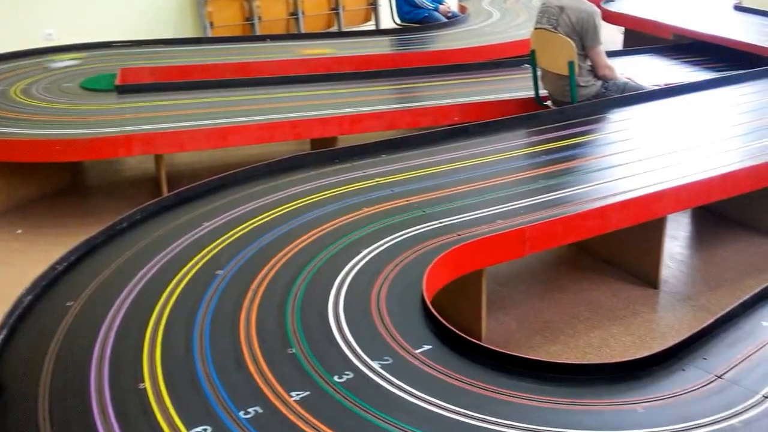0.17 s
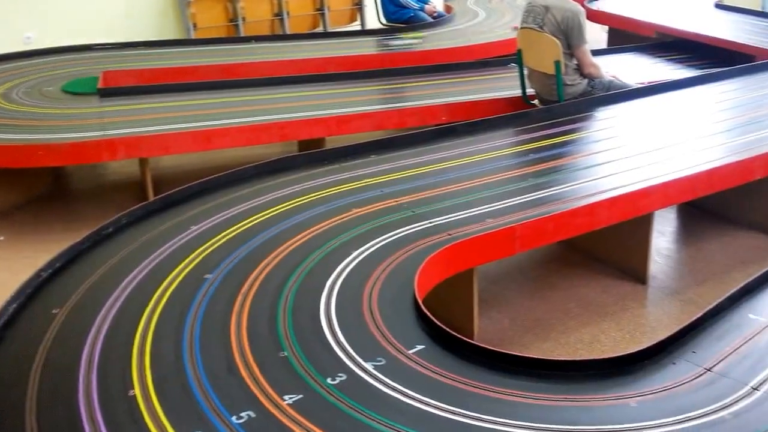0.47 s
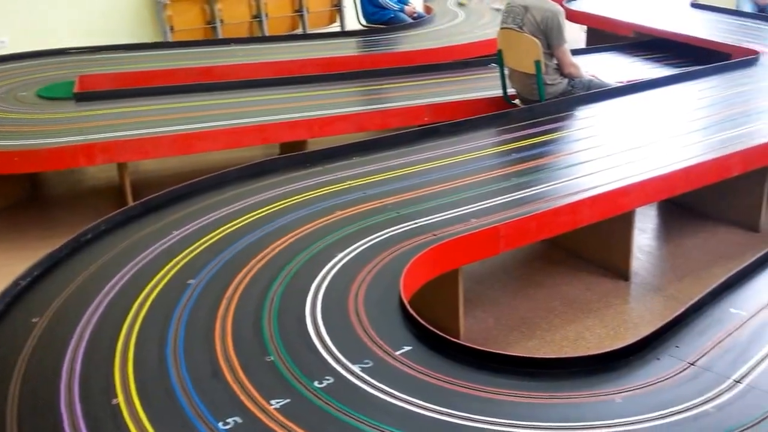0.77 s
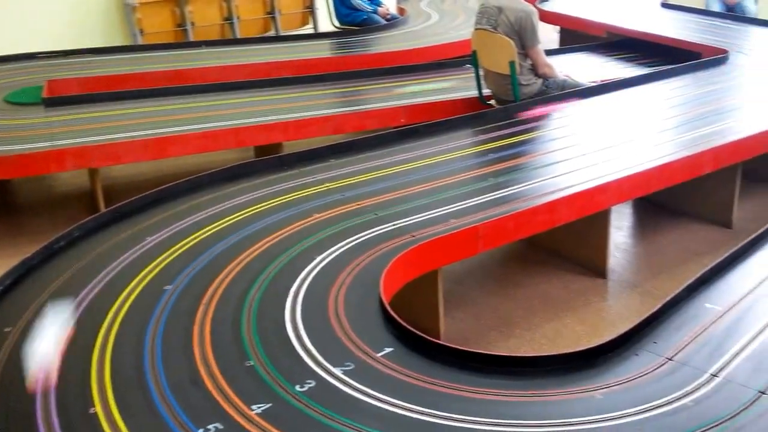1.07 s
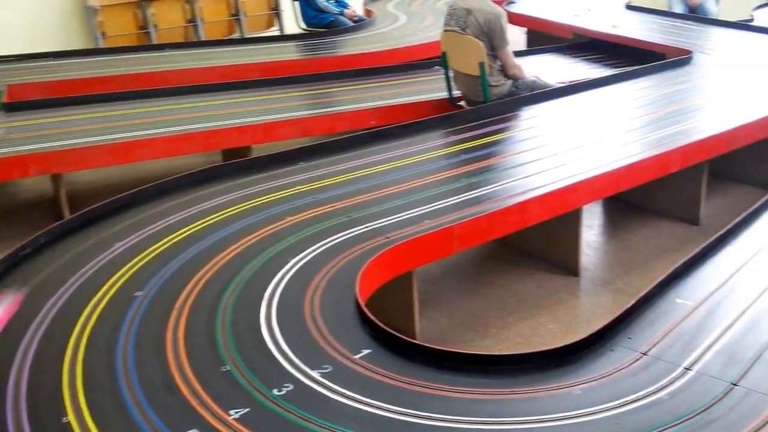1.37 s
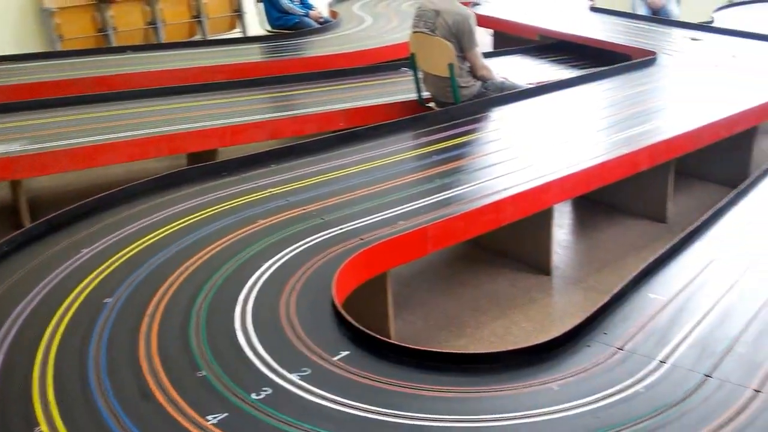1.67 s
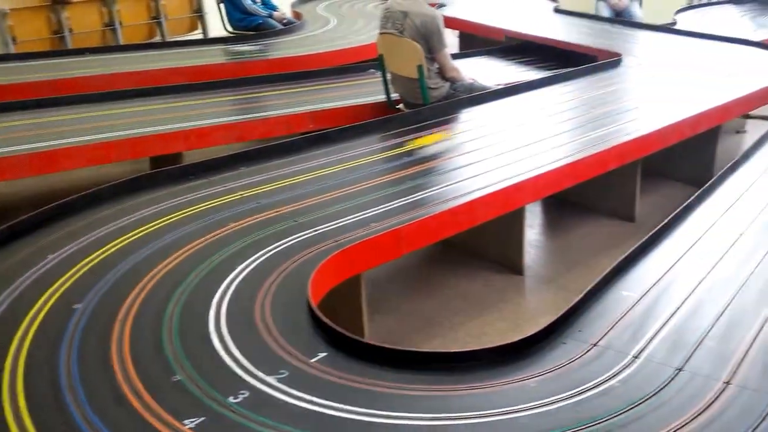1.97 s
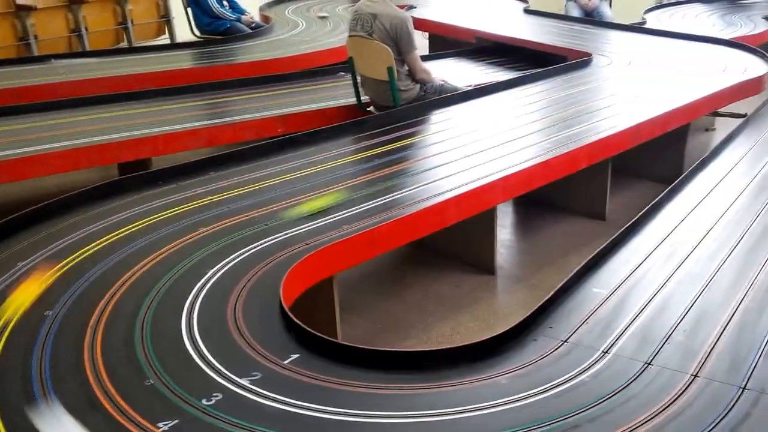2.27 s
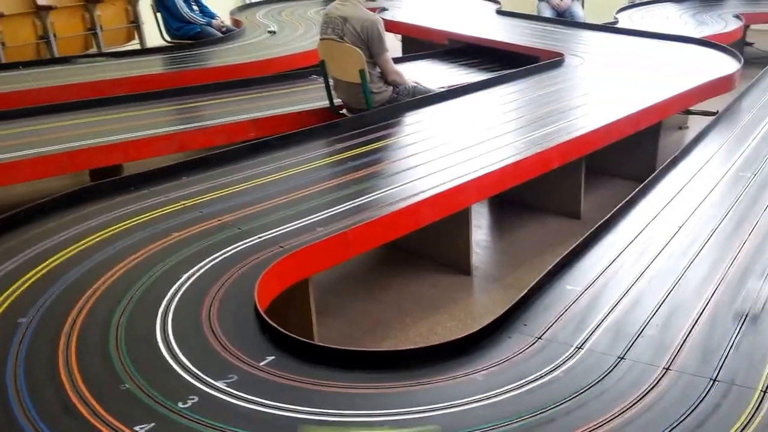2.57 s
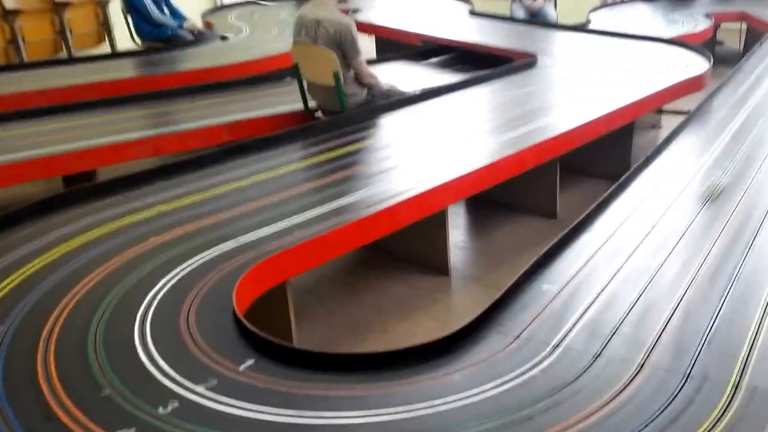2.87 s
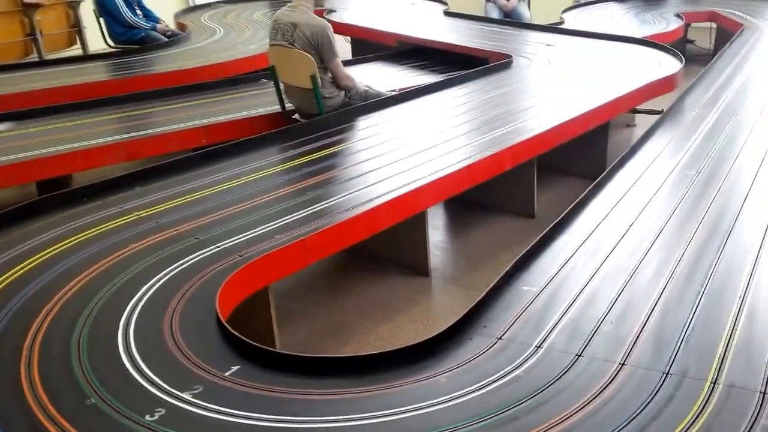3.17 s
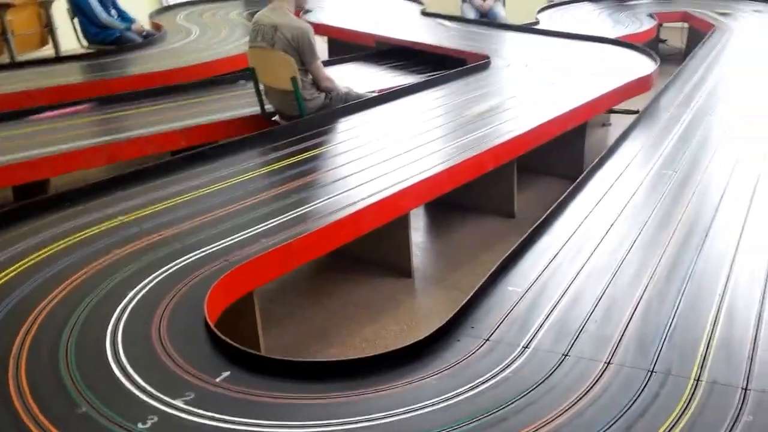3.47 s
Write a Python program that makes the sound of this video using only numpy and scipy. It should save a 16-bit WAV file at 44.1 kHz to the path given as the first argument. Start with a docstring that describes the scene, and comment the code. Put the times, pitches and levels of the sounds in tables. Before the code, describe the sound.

Small slot cars whine past on an indoor track, pitch rising and falling over a bright sizzle

```python
"""Slot cars race round a big wooden track in a hall. From the start, small three-pole motors whine
up on the straights and down into the bends, swelling as they come near, over a noisy sizzle,
tyre rumble on the boards and a steady hum. The rest of the field and the far lanes ring in the hall.
Halfway through comes a brief rattle; later the boards rumble more for a moment.
Motors and hum are built from sine waves; sizzle, rumble and rattle are shaped noise."""
import sys
import numpy as np
from scipy import signal
from scipy.fft import rfft, irfft
from scipy.io import wavfile
from scipy.ndimage import uniform_filter1d

SR = 44100
rng = np.random.default_rng(int(sys.argv[2]) if len(sys.argv) > 2 else 0)


def unload_wav(signal):
    """Save mono or channel-first audio to the path in sys.argv[1] as 16-bit WAV at rate SR, clipped to [-1, 1]."""
    wavfile.write(
        sys.argv[1],
        SR,
        np.round(np.clip(np.atleast_2d(signal).T, -1, 1) * 32767).astype(np.int16),
    )


N = 160083
TIME = np.arange(N) / SR  # s


def amp(db):
    """Turns decibels into a gain."""
    return 10 ** (np.asarray(db) / 20)


def unit(x):
    """Scales a signal to an rms of 1."""
    return x / np.sqrt(np.mean(abs(x) ** 2) + 1e-20)


def read(points, hz):
    """Reads a curve between its points, on a log-frequency axis."""
    f, value = np.transpose(points)
    return np.interp(np.log(hz + 1), np.log(f + 1), value)


def wander(rate_hz):
    """Smooth random motion with rms 1: noise whose spectrum fades out around the given rate."""
    f = np.fft.rfftfreq(N, 1 / SR)
    keep_slow = np.exp(-(f / rate_hz) ** 2) * (f > 0)
    return unit(irfft(rfft(rng.standard_normal(N)) * keep_slow, N))


# How alike noise is at the two ears, below 0 where they oppose: (f/Hz, likeness from -1 to 1)
EAR_LIKENESS = [(250, .988), (1200, .87), (2800, .45), (4000, -.05), (5000, -.5), (7000, -.8)]
# Which ear gets more of the noise: (f/Hz, left minus right level/dB)
EAR_BALANCE = [(300, -0.5), (1400, 1.5), (2900, -2.5), (4700, 0), (7000, -9)]


def noise(spectrum, level_db, patch_db, size=1024):
    """Two-ear noise with rms 1: random spectra in short frames, with drifting patches and a level field."""
    hop = size // 4
    hz = np.fft.rfftfreq(size, 1 / SR)
    t = np.arange(N // hop + 5) * hop / SR
    a, b, c, d, patches = rng.standard_normal((5, len(t), len(hz)))
    same = np.clip(read(EAR_LIKENESS, hz), -1, 1)
    left = a + 1j * b
    right = same * left + np.sqrt(1 - same ** 2) * (c + 1j * d)
    # Smooth the patches over 12 frames, then 3 frequency bins
    patches = uniform_filter1d(uniform_filter1d(patches, size=12, axis=0), size=3, axis=1)
    db = read(spectrum, hz) + patch_db * unit(patches) + level_db(t, hz)
    balance = read(EAR_BALANCE, hz)
    frames = np.array([(left * amp(db + balance / 2)).T, (right * amp(db - balance / 2)).T])
    return unit(signal.istft(frames, nperseg=size, noverlap=size - hop)[1][:, :N])


POLES = 3  # the whine is this multiple of the shaft speed
WHINE_DB = -2  # gain on every motor
RASP = 0.21  # depth of the gear chatter
FLUTTER = 0.33  # depth of the waver from track reflections, before closeness lessens it
CLOSE_DB = -19.5  # louder, closer cars flutter less in level and warble more in pitch
# The whine stands out more from the other partials as speed rises
CRUISE_HZ, PURITY_DB_PER_OCTAVE = 4160, 12
# Partials of a motor at 1, 2, 3 .. times the shaft speed: (level/dB at cruising speed)
PARTIALS = [-28.5, -27.5, 3.5, -17.5, -18.5, -6]


def motor(run, wobble, lag_ms=0, pan_db=0, fade_s=.015):
    """A motor sounds the multiples of its shaft speed, with jitter, flutter and gear chatter."""
    out = np.zeros((2, N))
    s, hz, db = np.transpose(run)
    on = np.flatnonzero((TIME > s[0] - fade_s) & (TIME < s[-1] + fade_s))
    t = TIME[on]
    # Random time shifts keep the unsteadiness of the motors apart
    shift = rng.integers(0, N, (len(PARTIALS), 4))
    gate = np.clip(np.minimum(t - s[0], s[-1] - t) / fade_s + 1, 0, 1)
    level = gate * amp(np.interp(t, s, db))
    closeness = 1 + (level / amp(CLOSE_DB)) ** 2
    jitter, chatter, flutter = wobble
    warble = 1 + np.sqrt(closeness) * jitter[on - shift[0, -1]]
    shaft = np.interp(t, s, hz) / POLES * warble
    turns = np.cumsum(shaft) / SR
    depth = FLUTTER / closeness
    steady_power = np.sqrt(1 + 2 * depth ** 2)
    purity_db = PURITY_DB_PER_OCTAVE * np.log2(POLES * shaft / CRUISE_HZ)
    for k, partial_db in enumerate(PARTIALS):
        multiple = k + 1
        partial = level * amp(partial_db - purity_db * (multiple != POLES)) / steady_power
        for ear, side in enumerate((.5, -.5)):  # left, right
            heard_turns = turns - side * shaft * lag_ms / 1000
            tone = np.exp(2j * np.pi * multiple * heard_turns)
            tone *= 1 + depth * flutter[on - shift[k, ear]] + RASP * chatter[on - shift[k, 2]]
            out[ear, on] += partial * tone.real * amp(side * pan_db)
    return amp(WHINE_DB) * out


def unsteadiness():
    """Random motion for all motors: pitch jitter, gear chatter and flutter from track reflections."""
    jitter = wander(44.7)
    chatter = wander(456) + 1j * wander(456)
    # Complex motion wavers both level and phase
    flutter = wander(34) + 1j * wander(34)
    return jitter, chatter, flutter


WOBBLE = .002  # relative speed jitter, before closeness raises it
# One row for each run of a tone within earshot; a few, near 6 kHz at 0.19 s and 2.56 s, sound the octave of a
# lower car's whine: (lag of left ear/ms, left minus right level/dB, # curve of (t/s, f/Hz of the tone, level/dB
# before the motor's gains))
NEAR_RUNS = [ (0.047, 1.5, [(0.0, 5270, -22.5), (0.06, 4880, -24.0), (0.11, 4315, -22.5),
             (0.17, 3710, -35.5)]), (0.071, -1.5, [(0.0, 3850, -44.5), (0.03, 4160, -20), (0.09, 4840, -21),
             (0.15, 5230, -32), (0.2, 5500, -21), (0.25, 5190, -29), (0.3, 4680, -26),
             (0.37, 3720, -39.5)]), (-0.088, -4, [(.19, 2790, -33), (.29, 2943, -27), (.35, 3350, -30),
             (.4, 3990, -24.5), (.5, 4990, -32.5), (.61, 5490, -31), (.72, 4720, -36), (.79, 3560, -38)]),
             (-0.096, -5, [(0.19, 6200, -27.5), (0.25, 5810, -25.0), (0.34, 6150, -32), (0.47, 6110, -34.5),
             (0.56, 6540, -33)]), (.045, -1, [(.91, 3900, -37), (1.0, 4780, -35), (1.15, 5860, -35)]),
             (0.061, 0, [(1.24, 3850, -33.5), (1.3, 4320, -28), (1.42, 3880, -35.5), (1.6, 4034, -28.5),
             (1.68, 4116, -19), (1.745, 4256, -22.5), (1.79, 4370, -25), (1.865, 4736, -15),
             (1.885, 4660, -20.5), (1.93, 4756, -10.5), (1.97, 4830, -16), (2.005, 4790, -20.5),
             (2.05, 4910, -19), (2.16, 5270, -30)]), (0.055, -2, [(1.2, 3794, -33), (1.42, 3713, -29.5),
             (1.54, 3530, -24.5), (1.6, 3790, -27), (1.64, 4466, -18.5), (1.69, 4617, -15.5),
             (1.745, 4900, -25.5), (1.8, 5000, -34.5), (1.92, 5350, -24.5)]), (.1, -4, [(2.03, 4910, -23.5),
             (2.11, 3930, -35.5)]), (-0.042, -5, [(2.11, 3970, -27), (2.14, 4660, -32.5), (2.18, 4730, -31),
             (2.24, 4350, -32), (2.33, 3310, -39), (2.42, 3133, -32.5), (2.62, 3315, -32.5),
             (2.72, 3427, -25), (2.795, 3343, -26.5), (2.87, 3540, -31), (2.955, 4120, -16.5),
             (3.0, 4580, -25), (3.11, 5290, -33.5), (3.2, 5840, -26), (3.26, 5160, -32),
             (3.345, 4060, -28.5), (3.47, 2480, -42)]), (-0.027, -3.5, [(2.24, 5270, -34.0),
             (2.31, 4910, -26), (2.345, 4570, -25.5), (2.41, 3720, -28.5)]),
             (-0.0074, 2.5, [(2.38, 5145, -29), (2.58, 5400, -31.5)]), (-.04, -2.5, [(2.48, 2770, -38.5),
             (2.6, 3008, -36), (2.72, 3090, -27.5), (2.78, 3050, -40.0), (2.88, 2950, -25.5),
             (2.955, 3137, -30), (3.015, 4300, -20.5), (3.07, 4864, -19), (3.1, 5146, -35),
             (3.19, 4900, -31), (3.28, 3680, -27)]), (.01, 0, [(2.56, 4850, -33), (2.66, 5560, -28),
             (2.86, 5780, -34), (2.915, 6020, -32), (2.96, 5530, -36)]), (-0.033, -2.5, [(2.92, 3030, -24),
             (2.95, 2790, -29), (2.985, 2900, -27), (3.005, 3400, -31.5), (3.03, 3960, -24),
             (3.068, 4440, -17.5), (3.12, 4790, -27.5), (3.25, 5633, -23), (3.295, 5160, -29),
             (3.34, 4450, -19.5), (3.41, 3500, -38), (3.49, 2500, -40)]), (.028, -1, [(3.52, 2350, -41),
             (3.57, 2900, -39), (3.63, 3780, -35)]), ]


def near_cars(jitter, chatter, flutter):
    """Each near run places one motor between the ears by a small delay and a level difference."""
    wobble = WOBBLE * jitter, chatter, flutter
    return sum(motor(run, wobble, lag_ms, pan_db) for lag_ms, pan_db, run in NEAR_RUNS)


# Up and down of the sizzle, each band about its own mean:
# (t/s, treble level/dB, upper middle level/dB)
SIZZLE_BANDS = [(0, -23.5, -33), (0.301, -28.5, -34), (0.601, -24, -34.5), (0.919, -37.5, -36),
                (1.401, -19, -33), (1.9, -25, -32.5), (2.449, -22.5, -33.5), (2.85, -26, -32),
                (3.12, -28, -35.5), (3.63, -30, -36)]


def sizzle_level(t, hz, split_hz=7399):
    """Treble follows one level curve above the split; everything below it follows the other."""
    s, treble, middle = np.transpose(SIZZLE_BANDS)
    treble_db = np.interp(t, s, treble - treble.mean())
    middle_db = np.interp(t, s, middle - middle.mean())
    return np.where(hz > split_hz, treble_db[:, None], middle_db[:, None])


SIZZLE_DB = -24.5
# Blurred sound of motors, gears and braids: (f/Hz, relative level/dB per Hz)
SIZZLE_SPECTRUM = [(400, -23.5), (800, -23), (1400, -19.5), (2100, -12.5), (2800, -6), (3400, -7.5),
                   (4400, -1), (5200, 1), (6200, -5.5), (7500, -15)]


def sizzle():
    """Motors, gears and braids blur together into bright noise."""
    return amp(SIZZLE_DB) * noise(SIZZLE_SPECTRUM, sizzle_level, patch_db=2.5)


def rumble_level(t, hz):
    """The boards rumble more as the pack rounds the near bend: one smooth swell."""
    swell_s, length_s, swell_db = 2.68, 0.18, 4
    return swell_db * np.exp(-((t[:, None] - swell_s) / length_s) ** 2)


RUMBLE_DB = -41.5
# Rumble of the boards and hall: (f/Hz, relative level/dB per Hz)
RUMBLE_SPECTRUM = [(20, -46.5), (42, -23), (65, -4.5), (145, 1.5), (180, -6), (255, -6), (450, -18.5),
                   (2000, -49)]


def rumble():
    """Tyres on the boards make low noise; long frames resolve its deep end."""
    return amp(RUMBLE_DB) * noise(RUMBLE_SPECTRUM, rumble_level, patch_db=1.5, size=4096)


HUM_HZ, HUM_DB = 374.8, -44.5
# Faint octave above the hum, sinking over time: (t/s, level/dB)
OCTAVE_LEVEL = [(.6, -58), (3, -68)]


def hum():
    """A steady sine wave with a faint one at twice its frequency."""
    phase = 2 * np.pi * HUM_HZ * TIME
    low = amp(HUM_DB) * np.sin(phase)
    octave = amp(np.interp(TIME, *np.transpose(OCTAVE_LEVEL))) * np.sin(2 * phase)
    return np.sqrt(2) * (low + octave)  # levels are rms


# Middle whine, spread of its logarithm, and level sent to the hall
FIELD_HZ, FIELD_SWING, FIELD_DB = 4273, .22, -33.5
THROTTLE_HZ = 2.2  # how quickly the speeds wander


def rest_of_field(count=10):
    """Cars on the far side speed up and brake at random, louder when faster: one sine wave each."""
    out = np.zeros(N)
    for _ in range(count):
        throttle = 2 * np.tanh(wander(THROTTLE_HZ) / 2)  # extremes are held in
        hz = FIELD_HZ * np.exp(FIELD_SWING * throttle)
        loudness = hz * np.exp(.5 * wander(12))
        out += loudness * np.sin(2 * np.pi * np.cumsum(hz) / SR)
    return amp(FIELD_DB) * unit(out)


def hall(x, t60_s=0.82, gap_s=.008):
    """Reflections form a diffuse tail of dying noise, different at each ear."""
    t = TIME[:SR]
    tail = rng.standard_normal((2, SR)) * amp(-60 * t / t60_s) * (t > gap_s)
    return signal.fftconvolve(x, tail / np.linalg.norm(tail[0]), axes=1)[:, :N]


FAR_WOBBLE = 0.00998  # relative speed jitter, before closeness raises it
# Runs on the far lanes, one curve each: (t/s, f/Hz of the whine, level/dB before the later gains)
FAR_LANE_RUNS = [
    [(.13, 4480, -30), (.28, 5400, -22)],
    [(0.36, 2978, -34.5), (0.53, 3165, -41)],
    [(0.78, 2370, -44.5), (0.91, 2793, -36)],
    [(1.04, 2350, -39), (1.2, 3150, -38)],
    [(1.05, 3950, -34), (1.21, 4560, -23)],
    [(1.93, 6230, -41), (2.01, 5650, -30.5)],
    [(2.04, 3100, -36.5), (2.12, 3670, -35), (2.21, 3504, -36)],
    [(2.11, 2280, -38), (2.185, 2800, -37), (2.28, 4950, -29)],
    [(3.43, 4726, -32.5), (3.54, 4826, -30.5), (3.63, 4940, -35)],
]


def far_lane_cars(jitter, chatter, flutter):
    """Motors on the far lanes sound midway between the ears, with stronger speed jitter."""
    wobble = FAR_WOBBLE * jitter, chatter, flutter
    return sum(motor(run, wobble) for run in FAR_LANE_RUNS)


RATTLE_S, RATTLE_LENGTH_S, RATTLE_DB = 1.528, 0.086, -37.5
# A brief rattle, perhaps a loose body shell: (f/Hz, relative level/dB per Hz)
RATTLE_SPECTRUM = [(950, -16.5), (1230, -12.5), (1950, -3), (2500, -24.5)]


def rattle():
    """A short, smooth swell of noise, perhaps from a loose body shell."""
    steady = noise(RATTLE_SPECTRUM, lambda t, hz: 0, patch_db=2.5)
    return amp(RATTLE_DB) * steady * np.exp(-((TIME - RATTLE_S) / RATTLE_LENGTH_S) ** 2)


NEAR_HALL_DB, FAR_DIRECT_DB, FAR_HALL_DB = -10.5, -2, -0.5


def scene():
    """Near cars are heard directly, far ones more through the hall, over sizzle, rumble and hum."""
    wobble = unsteadiness()
    near = near_cars(*wobble) + rattle()
    far = far_lane_cars(*wobble)
    echo = hall(amp(NEAR_HALL_DB) * near + amp(FAR_HALL_DB) * far + rest_of_field())
    return near + amp(FAR_DIRECT_DB) * far + echo + sizzle() + rumble() + hum()


SOFT_HZ, EDGE_HZ = 7804, 8300  # the microphone's treble roll-off, then the upper band limit


def record(dry):
    """The microphone's treble rolls off steeply, then a low-pass filter limits the band."""
    f = np.fft.rfftfreq(N, 1 / SR)
    soft = irfft(rfft(dry) / (1 + (f / SOFT_HZ) ** 40), N)
    low_pass = signal.firwin(511, EDGE_HZ, window=("kaiser", 9), fs=SR)
    return signal.oaconvolve(soft, low_pass[None], "same")


dry = scene()
out = record(dry)
unload_wav(out)
```